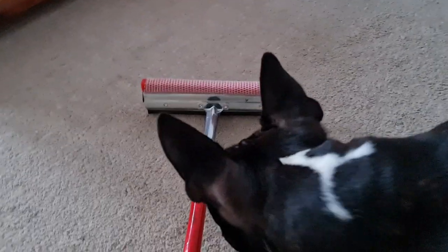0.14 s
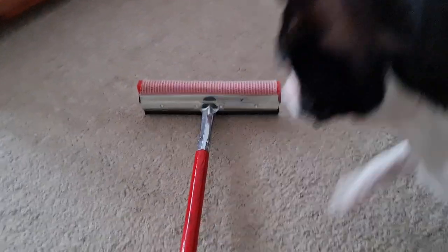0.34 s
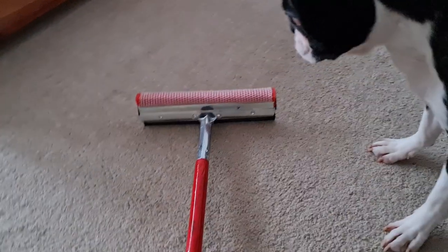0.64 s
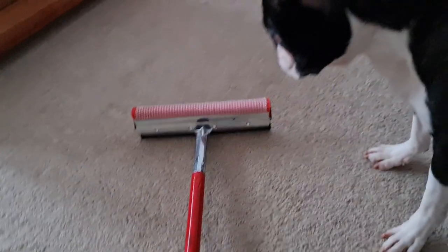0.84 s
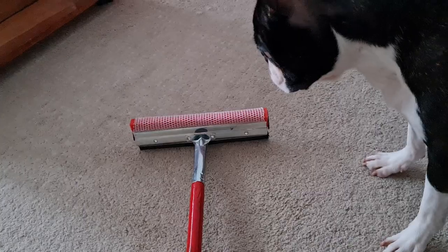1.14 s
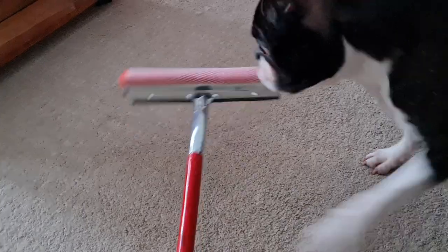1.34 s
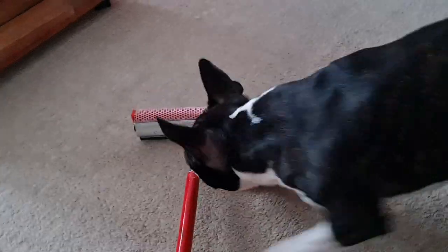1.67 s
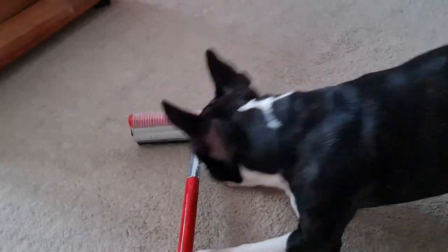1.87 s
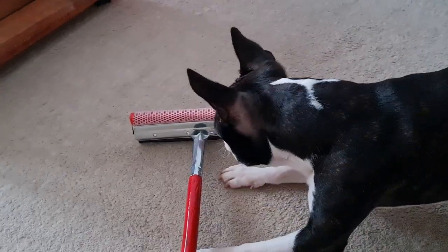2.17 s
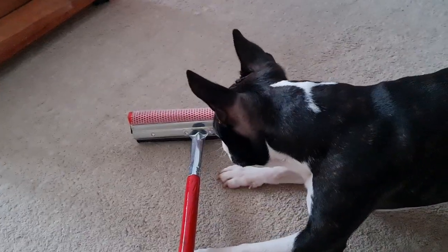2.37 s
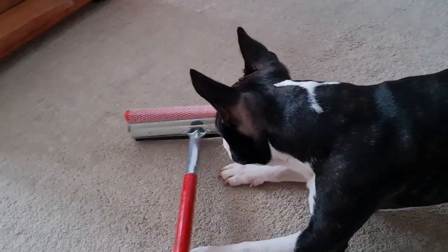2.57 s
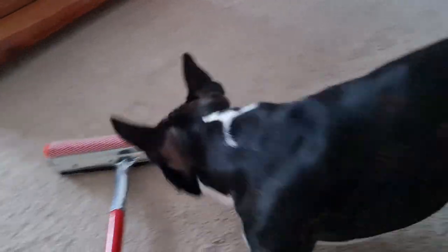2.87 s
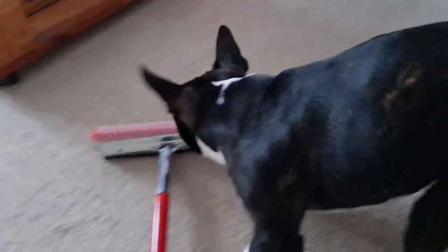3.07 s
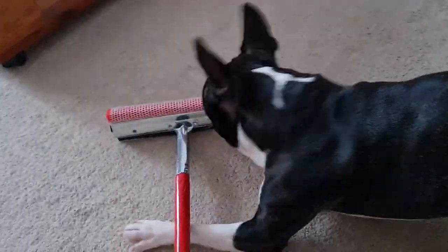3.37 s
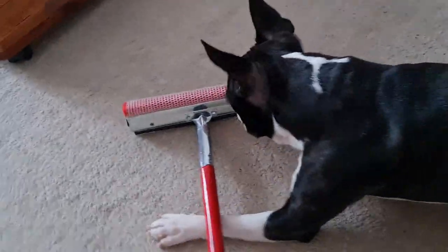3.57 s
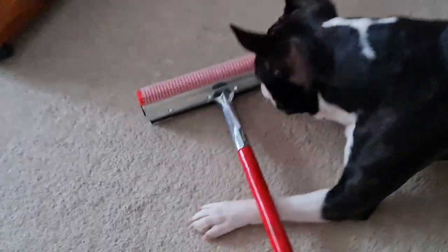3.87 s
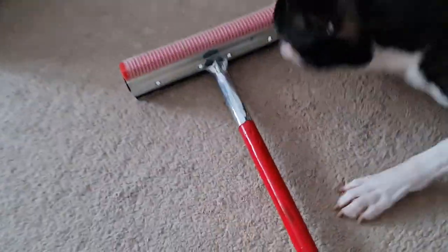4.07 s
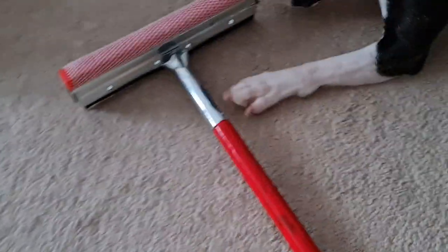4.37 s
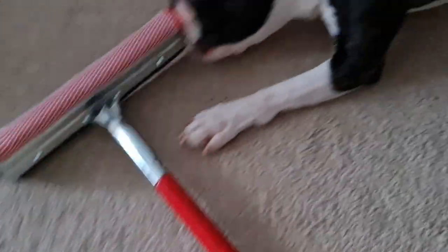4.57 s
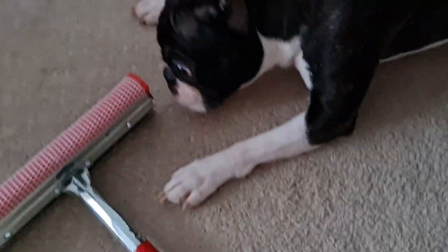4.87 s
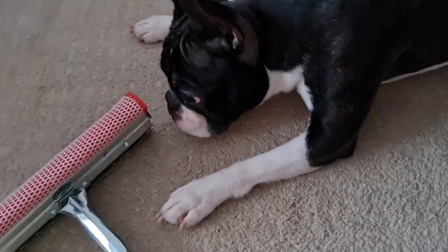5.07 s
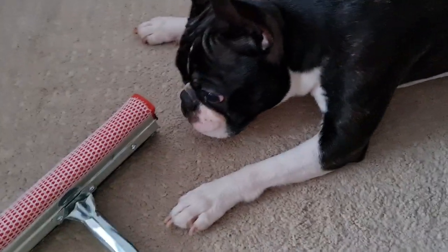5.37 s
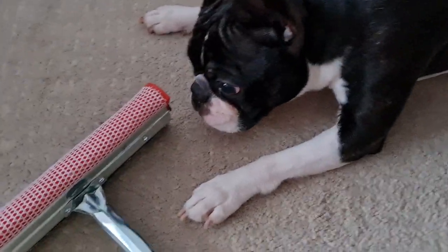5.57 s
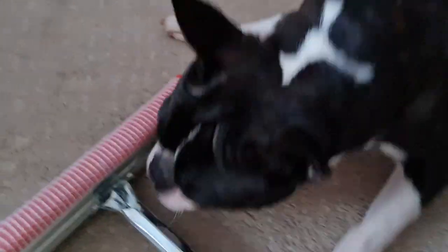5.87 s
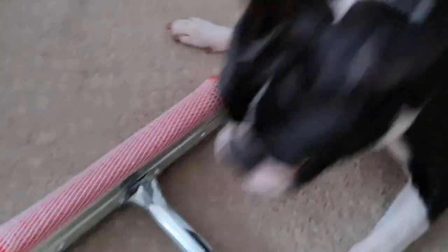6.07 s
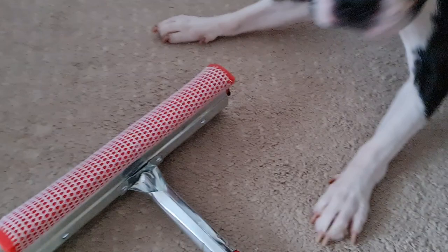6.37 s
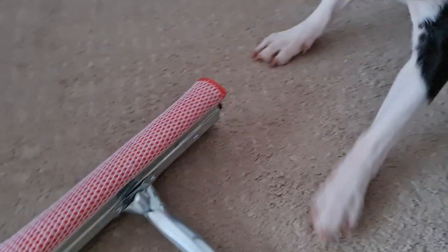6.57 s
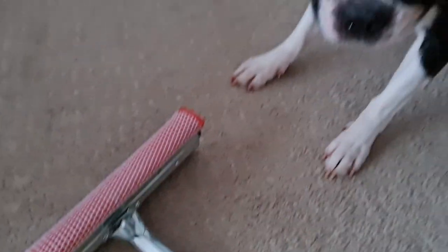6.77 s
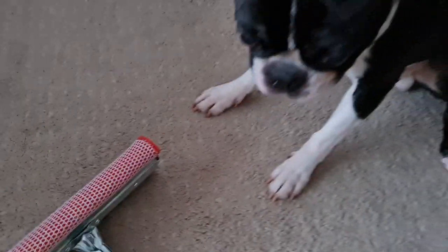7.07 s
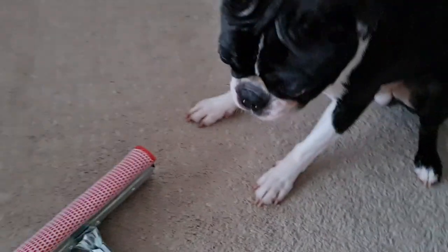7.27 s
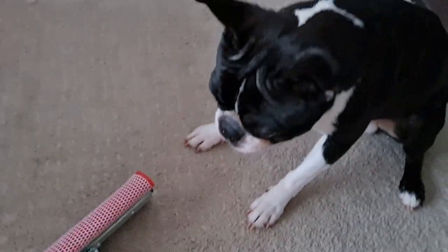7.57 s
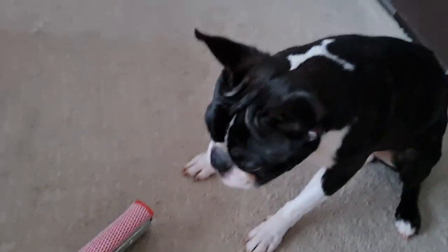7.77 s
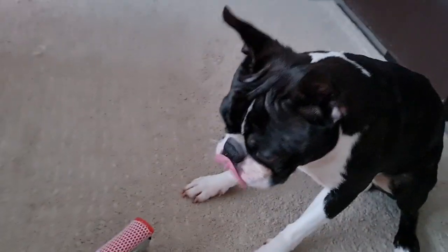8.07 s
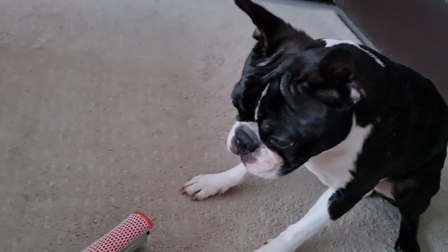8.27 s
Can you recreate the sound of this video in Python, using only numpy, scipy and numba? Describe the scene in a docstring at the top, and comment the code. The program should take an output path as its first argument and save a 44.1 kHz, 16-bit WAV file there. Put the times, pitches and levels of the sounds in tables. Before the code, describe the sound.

A small flat-nosed dog huffs and snorts close by, thumping, scuffing and clicking at a hard tool on carpet in a quiet room.

```python
"""Short nasal huffs, two flapping snorts, thumps, scuffs and clicks over a quiet room.
A small flat-nosed dog pounces at a squeegee on carpet, about a metre from a hand-held phone.
Huffs are noise ringing throat, nose and nostrils; snorts are palate slaps with air leaking by.
Blows excite the floor's low modes, contacts ring short resonances, dragging is jerky low noise;
a furnished room answers, and the phone's two microphone ports take it all in."""
import sys
import numpy as np
from scipy import signal
from scipy.fft import rfft, irfft, next_fast_len
from scipy.io import wavfile
from numba import njit

SR = 44100
rng = np.random.default_rng(int(sys.argv[2]) if len(sys.argv) > 2 else 0)


def store_pcm(level_fs):
    """Save levels as 16-bit WAV."""
    pcm = np.round(np.clip(level_fs, -1, 1) * 32767).astype(np.int16)
    wavfile.write(sys.argv[1], SR, np.atleast_2d(pcm).T)


N = 370910

# huffs: fully open t/s, swelling t/s, sagging t/s, crest level/dB, throat level/dB and nostril hiss
# level/dB against the nose, throat f/Hz at the crest, nose f/Hz, nose treble level/dB at 5 kHz,
# nostril f/Hz, fizz level/dB at 12 kHz
HUFFS = [(0.159, 0.037, 0.15, -47.5, -7, -8, 1250, 1840, -3.5, 9600, -2),
         (0.295, 0.06, 0.042, -37.5, -10.5, -1, 1250, 2500, -0.5, 9300, 0),
         (0.405, 0.031, 0.07, -51, -0.5, -5.5, 1250, 1900, 0, 9450, -5),
         (0.56, 0.051, 0.027, -68, -19, -8, 1000, 2100, 2, 9300, -1),
         (1.225, 0.017, 0.0083, -62, -9, -4, 870, 3280, 3, 9000, 4),
         (1.31, 0.11, 0.028, -58.5, -7, -1, 1100, 3000, -2, 9000, 3),
         (1.44, 0.033, 0.082, -57.5, -8, 7.5, 664, 2700, -5, 9100, 7),
         (1.51, 0.052, 0.048, -52, 4, 3, 1380, 3200, -8, 8700, 1),
         (1.645, 0.071, 0.089, -49.5, 7, -1, 1050, 2140, -3.5, 8700, 4),
         (1.803, 0.0092, 0.073, -45.5, 14.5, 4.5, 1080, 2630, -1, 9800, 2.5),
         (1.896, 0.0065, 0.17, -51.5, -1.5, -14, 1200, 2817, -10, 9100, 7),
         (2.617, 0.046, 0.06, -46.5, -10, -9, 1450, 2830, 0.5, 7900, -2),
         (2.688, 0.018, 0.069, -52.5, -4.5, 4, 1390, 2900, -5, 8900, 8),
         (2.809, 0.029, 0.05, -42.5, -23, -5, 1300, 2750, -1.5, 8400, 3),
         (2.885, 0.068, 0.012, -48, 3.5, -13, 1320, 2600, -3.5, 8600, 9),
         (2.992, 0.034, 0.015, -45, -14, -25, 1200, 2630, -3, 7800, 2),
         (3.084, 0.043, 0.058, -49, -4, -16, 1200, 2770, -5.5, 9000, 1),
         (3.191, 0.053, 0.067, -43, -4, 1, 1500, 1970, -3, 8900, 0.5),
         (3.277, 0.025, 0.075, -35.5, 3, -4, 1300, 2430, -3.5, 8700, 0.5),
         (3.43, 0.023, 0.3, -70, 2.5, -2.5, 1220, 2780, 7, 9000, 0.5),
         (3.707, 0.047, 0.22, -57.5, -10, -9.5, 1317, 2510, -2.5, 8600, 3),
         (3.953, 0.062, 0.036, -43, -2.5, -15, 1250, 2175, -6.5, 7800, -2),
         (4.092, 0.014, 0.039, -54.5, 8.5, -1, 1310, 2240, 0, 9500, 2),
         (4.201, 0.06, 0.054, -47.5, 2, -9, 1200, 2230, -4, 8500, -1),
         (4.332, 0.043, 0.012, -49, 3.5, -1, 1160, 2500, 0, 9200, 0),
         (4.48, 0.23, 0.034, -64.5, 17, -1, 1340, 3280, -1.5, 8300, -3),
         (4.787, 0.0091, 0.16, -63, 8.5, -6, 1005, 2344, -1, 10000, -8),
         (5.161, 0.042, 0.14, -75.5, 9, -17, 960, 4320, 4, 9000, -5.5),
         (5.56, 0.04, 0.04, -58.5, 4, -18.5, 640, 2300, -3, 7100, -1),
         (5.634, 0.035, 0.066, -47, -1, -18, 638, 2310, 1.5, 7100, 6),
         (5.692, 0.022, 0.04, -48, -2.5, -0.5, 1100, 2950, -1, 7500, -6),
         (5.738, 0.033, 0.068, -43.5, -1, -19, 1100, 2780, -0.5, 7600, 5),
         (5.84, 0.072, 0.074, -50, 9.5, -22, 1038, 2600, -3, 7100, 0),
         (6.008, 0.019, 0.065, -45, -1.5, -6, 1200, 3160, 0, 10100, 0),
         (6.103, 0.068, 0.067, -40, 4, -8.5, 1100, 3250, -5, 8900, 3),
         (6.272, 0.11, 0.089, -44, -17, -5, 1350, 3040, -0.5, 9450, 3.5),
         (6.442, 0.091, 0.058, -44, 0, -3, 1000, 3000, -2.5, 9050, 5),
         (6.641, 0.017, 0.011, -58, -3, -15.5, 758, 3000, -7.5, 9000, 2),
         (7.614, 0.051, 0.035, -58, -7, -2.5, 1200, 3506, 3.5, 8900, -9),
         (7.756, 0.013, 0.065, -38.5, -7, -5, 1200, 2340, 2, 9050, -6.5),
         (7.809, 0.044, 0.12, -42.5, -3.5, -0.5, 1250, 2220, 6, 9130, -4),
         (7.92, 0.068, 0.025, -46, -5.5, 3.5, 1150, 3700, -2.5, 9100, -1)]
# muzzle direction and wetness: t/s, left minus right level/dB, palate flutter share (0-1)
MUZZLE = [(.3, -4.5, 0.08), (1.55, -5, 0.4), (1.85, -2.5, 0.4), (2.7, -5, 0.42), (3.3, -4, 0.13),
          (3.75, -7.5, 0.2), (4.0, -1.5, 0.5), (4.35, -1.5, 0.1), (5.7, -4, 0.2), (6.17, 1.5, 0.19),
          (6.45, -2, 0.16), (7.8, 0.5, 0.3), (8.0, 1, 0)]
# fixed colour of the nasal passages: f/Hz, relative level/dB
NASAL_COLOUR = [(300, -24), (600, -12), (1200, -5), (1800, -1.5), (3200, -1), (3900, -4.5), (5200, -2.5),
                (6400, -9.5), (8000, -16), (14000, -29)]
# fixed colour of the jet at the nostrils: f/Hz, relative level/dB
NOSTRIL_COLOUR = [(4000, -21), (7000, -13.5), (8400, -7), (9600, -10), (10700, -12.5), (12300, -13),
                  (14200, -17.5), (15800, -14.5)]
# fixed colour of the throat: f/Hz, relative level/dB
THROAT_COLOUR = [(60, -14), (130, 2.5), (240, -19.5), (380, -9.5), (540, 1), (750, -0.5), (950, -4.5),
                 (1400, -6), (1800, -13.5), (3000, -36.5)]
# air ringing in a narrowing: start t/s, end t/s, start f/Hz, end f/Hz, level/dB,
# sharpness (twice the Q of each of two passes)
WHISTLES = [(0.214, 0.392, 737, 750, -52, 10), (0.679, 1.08, 940, 910, -76.5, 6.4),
            (1.016, 1.215, 2100, 1840, -74, 6.1), (1.497, 1.537, 1340, 1240, -43, 16),
            (1.545, 1.608, 1320, 1579, -43.5, 14), (1.555, 1.632, 1743, 2790, -46, 4.5),
            (1.5, 1.67, 3160, 3540, -58.5, 11), (1.815, 1.933, 1126, 1200, -56, 8.5),
            (3.268, 3.33, 1400, 1200, -31.5, 8.5), (3.3, 3.369, 750, 674, -44.5, 7.5),
            (3.815, 3.972, 7450, 7540, -66.5, 6.9), (4.443, 4.8, 1390, 1370, -56, 14),
            (4.705, 5.128, 1018, 928, -68.5, 13.3), (4.77, 4.99, 4800, 4700, -73.5, 8.2),
            (4.775, 4.959, 10160, 10560, -84, 23), (6.011, 6.074, 4940, 4760, -51, 16),
            (6.218, 6.63, 1200, 920, -49.5, 5.4), (6.08, 6.244, 3150, 3120, -49.5, 9),
            (6.26, 6.61, 3160, 3050, -54.5, 13), (7.679, 7.806, 1080, 1030, -61, 19),
            (7.752, 7.852, 1060, 786, -40, 4.1), (7.772, 8.015, 1600, 2290, -51.5, 4.4),
            (7.95, 8.054, 9270, 8000, -57.5, 10)]
# one curve per snort: t/s, flap rate f/Hz, peak level/dB before slap_db, treble level/dB at 8 kHz
SNORTS = [
    [(4.426, 23, -44, 17), (4.464, 29.7, -25.5, 3.5), (4.5, 25.4, -29.5, 5), (4.535, 25.8, -21.5, -7),
     (4.615, 23.6, -24.5, 0), (4.66, 36.4, -18.5, 0), (4.715, 35.93, -32, 14)],
    [(6.152, 58.4, -46, 0), (6.18, 63.6, -25, -15), (6.215, 64, -26.5, -13)],
]
# colour of the airway that a flap rings: f/Hz, relative level/dB
AIRWAY_COLOUR = [(50, -3), (140, 8.5), (270, -6), (530, 8), (720, 0.5), (900, -0.5), (1400, 6), (1800, -24),
                 (2080, -3.5), (2450, -32), (3200, -4), (3800, -29), (8000, -13), (15000, -50)]
# paws and squeegee landing and bouncing on the carpet: t/s, peak level/dB, centre of the push f/Hz
THUMPS = [(0.396, -39.5, 240), (0.478, -42.5, 224), (1.417, -22.5, 170.7), (1.428, -9.5, 310),
          (1.431, -18, 136), (1.445, -19.5, 300), (1.4553, -21, 330), (1.4623, -25.5, 390),
          (1.473, -24.5, 373.6), (1.586, -28, 327), (1.719, -32, 139), (1.812, -33, 280), (2.802, -21, 270),
          (2.901, -25, 397.7), (2.948, -29, 420.4), (3.13, -38.5, 357), (3.245, -23, 250.4),
          (3.975, -39.5, 470), (4.002, -32.5, 420), (4.18, -29.5, 270), (5.739, -26, 118),
          (5.785, -43, 134.3), (5.84, -41, 480), (5.969, -32.5, 160), (6.196, -50, 200)]
# modes of the carpeted floor: f/Hz, relative level/dB, t60/s
FLOOR_MODES = [(61.1, -18, 0.9), (122, -12.5, 0.3), (160, -5, 0.12), (200, 0.5, 0.018), (258, -9, 0.029),
               (353, -3, 0.057), (400, -6.5, 0.04), (472, 3.5, 0.025), (534, -9.5, 0.13),
               (699, -13.5, 0.15), (1100, -18.5, 0.058), (1140, -20.5, .06)]
# the dog scuffling on the carpet: start t/s, length t/s, level/dB at the height of the effort
SCUFFLES = [(1.594, 0.23, -46.5), (2.633, 0.31, -54), (2.827, 0.11, -41), (2.887, 0.2, -43.5),
            (3.094, 0.085, -51), (3.245, 0.15, -43), (3.966, 0.16, -47.5), (4.18, 0.14, -47),
            (5.748, 0.092, -43), (5.853, 0.21, -47), (6.161, 0.086, -50)]
# colour of the scuffling: f/Hz, relative level/dB
DRAG_COLOUR = [(40, -0.5), (75, 8), (135, 0), (250, -5), (440, 1.5), (800, -15.5), (2000, -37)]
# claws, teeth and lips clicking: t/s, peak level/dB before click_db, centre f/Hz, rattle t60/s
CLICKS = [(1.428, -21.5, 1698, 0.013), (1.427, -29, 5330, 0.018), (1.429, -16.5, 730, 0.016),
          (1.4362, -22.5, 2030, 0.0043), (1.519, -37.5, 3000, 0.012), (1.548, -35, 2600, 0.022),
          (1.8075, -28.5, 10600, 0.017), (1.9195, -51, 3790, 0.019), (2.309, -63.5, 6130, 0.022),
          (2.803, -33.5, 755, 0.012), (2.939, -33, 1200, 0.014), (2.95, -32.5, 2140, 0.014),
          (3.2442, -24.5, 2120, 0.015), (3.2788, -17.5, 1270, 0.014), (3.6924, -47, 2300, 0.025),
          (4.0254, -32, 1480, 0.015), (4.098, -37, 780, 0.043), (4.1798, -35, 1600, 0.01),
          (4.264, -29, 1100, 0.014), (4.382, -33, 1120, 0.054), (4.4425, -42, 1150, 0.01),
          (4.649, -47, 4670, 0.015), (4.677, -43, 4470, 0.02), (5.335, -67, 5010, 0.026),
          (5.392, -68.5, 2410, .015), (5.743, -32.5, 788, 0.01), (5.8433, -33.5, 900, 0.012),
          (5.8867, -25, 5000, 0.033), (5.925, -26.5, 1100, 0.022), (7.246, -63, 1503, 0.023),
          (7.289, -61, 1014, 0.015), (7.392, -53, 1100, 0.023), (7.502, -59.5, 1100, 0.021),
          (7.768, -29, 1100, 0.03), (8.125, -43, 4310, 0.022)]
# reverberation of the furnished room: f/Hz, t60/s, relative level/dB
ROOM_BANDS = [(119, 0.5, -6), (403, 0.35, -3.5), (1200, 0.36, -1), (3000, 0.45, -2), (7837, 0.17, 5),
              (13900, 0.26, -10.5)]
# colour of the still room: f/Hz, relative level/dB
HUSH_COLOUR = [(15, -40), (25, -1.5), (75, 2), (178, -23.5), (297, -17.5), (631, -28.5), (3720, -37.5),
               (7700, -50.5), (8580, -45), (15500, -45.5)]

# a huff opens for this share of its swelling time, swells to its crest, sags and is let go
OPENING_SHARE, SWELL_DB, SAG_DB, RELEASE_DB_PER_S = 1, 8, 12, 268
# the jet grows faster than the flow (power law); the throat resonance sinks as the lungs empty
HISS_POWER, THROAT_SINK_OCT_PER_S = 1.1, 0.47
# the twitching nose shifts its resonance, and the flow surges unevenly
TWITCH_OCT, TWITCH_HZ, SURGE_DB, SURGE_HZ = 0.12, 17, 1.5, 46.18
# air squeezes by before and after a flap, fading with this time constant
LEAK_S = 0.0045
# halfway between flaps the palate rebounds, weaker and hissier
REBOUND_DB, REBOUND_TREBLE_DB = -10, 4.5
# the weight follows the first touch as a second push, then shifts with a short rumble
SETTLE_S, SETTLE_DB, RUMBLE_DB, RUMBLE_S = 0.00453, -8.5, -35, 0.032
# below this pitch the floor lags, per octave down and for at most two octaves
BEND_TOP_HZ, BEND_LAG_S = 480, 0.004
# time a scuffle takes to set in
DRAG_ATTACK_S = 0.013
# the dog is off centre: its sound reaches the right port a little later
PORT_LAG_S = 0.00002
# top of the phone's range, also the upper limit for the softness of a click
TOP_HZ = 15800


def huffs(throat_ring=0.8, nose_ring=0.98, nostril_ring=1.2,
          throat_width_hz=320, nose_width_hz=900, nostril_width_hz=1100):
    """Turbulent air rings throat and nose, and hisses out of the narrow nostrils."""
    pan_db, wet = curves(MUZZLE)
    wet = np.clip(wet, 0, 1)
    puffs = flutter(rate_hz=110, scatter_db=3.5, fade_s=0.0075)
    chop = np.sqrt(1 - wet + wet * puffs ** 2)
    throat_air = colour(chop * rng.standard_normal(N), THROAT_COLOUR)
    nose_air = colour(chop * rng.standard_normal(N), NASAL_COLOUR)
    jet = colour(np.sqrt(chop) * rng.standard_normal(N), NOSTRIL_COLOUR)
    twitch = 2 ** (TWITCH_OCT * wander(TWITCH_HZ))
    surge = undb(SURGE_DB * wander(SURGE_HZ))
    air = ports(chop ** 2 * whistles(), turn_rad=2.4)
    for (s, swell_s, sag_s, db, throat_db, hiss_db, throat_hz, nose_hz,
         treble_db, nostril_hz, fizz_db) in HUFFS:
        i = np.arange(int(s * SR) - SR // 8, min(int(s * SR) + SR // 2, N))
        t = i / SR - s
        flow = airflow(t, swell_s, sag_s) * surge[i]

        sinking_hz = throat_hz * 2 ** (-THROAT_SINK_OCT_PER_S * (t - swell_s))
        throat_tone = resonate(throat_air[i], sinking_hz, throat_width_hz)[0]
        throat = unit(throat_air[i] + throat_ring * throat_tone)

        nose_tone = resonate(nose_air[i], nose_hz * twitch[i], nose_width_hz)[0]
        nose = nose_air[i] + nose_ring * nose_tone
        nose = colour(nose, [(2800, 0), (5000, treble_db), (12000, fizz_db)])

        nostril_tone = resonate(jet[i], nostril_hz, nostril_width_hz)[0]
        nostril = unit(jet[i] + nostril_ring * nostril_tone)
        nostril = colour(nostril, [(10000, 0), (12000, fizz_db)])
        hiss = undb(hiss_db) * nostril * flow ** HISS_POWER

        breath = flow * (undb(throat_db) * throat + nose) + hiss
        air[:, i] += undb(db) * ports(breath)
    return nearby(air) * undb(np.array([pan_db, -pan_db]) / 2)


def airflow(t, swell_s, sag_s):
    """Strength of one huff: it opens before t = 0, then swells, sags and is released."""
    held_db = np.interp(t, [0, swell_s, swell_s + sag_s], [-SWELL_DB, 0, -SAG_DB])
    release_db = -RELEASE_DB_PER_S * np.maximum(t - swell_s - sag_s, 0)
    # a sharp huff also opens sharply
    opening = np.clip(1 + t / (OPENING_SHARE * swell_s), 0, 1) ** 2
    return opening * undb(held_db + release_db)


def whistles():
    """Eddies at a narrowing ring gliding, breathy notes."""
    out = np.zeros(N)
    for start, end, from_hz, to_hz, db, sharpness in WHISTLES:
        size = max(int((end - start) * SR), 100)
        hz = np.geomspace(from_hz, to_hz, size)
        width = hz / sharpness * 2
        note = resonate(resonate(rng.standard_normal(size), hz, width), hz, width)[0]
        swell = np.sin(np.pi * np.arange(size) / size)
        out[int(start * SR):][:size] += undb(db) * unit(note * swell)
    return out


def snort(slap_db=-1, slap_hz=1900, leak_db=-26, pan_db=2):
    """The soft palate slaps shut again and again; slaps and leaking air both ring the airway."""
    out = np.zeros((2, N))
    t = np.arange(-SR // 50, SR // 20) / SR
    # soft tissue closes dully, so most of the treble is escaping air
    dull = signal.butter(4, slap_hz, fs=SR, output="sos")
    slap = signal.sosfilt(dull, (t == 0) * 1.)
    for one_snort in SNORTS:
        for s, db, treble_db in flaps(one_snort):
            leak = np.exp(-np.abs(t) / LEAK_S) * rng.standard_normal((2, len(t)))
            tilted = [(hz, level_db + treble_db * hz / 8000) for hz, level_db in AIRWAY_COLOUR]
            ring = colour(slap + undb(leak_db) * leak, tilted)
            add(out, s + t[0], ring, db + slap_db)
    return out * undb(np.array([[pan_db], [-pan_db]]) / 2)


def flaps(one_snort):
    """The palate shuts once a cycle and rebounds halfway: t/s, peak and treble level/dB."""
    rate, db, treble_db = curves(one_snort)
    i = np.arange(int(one_snort[0][0] * SR), int(one_snort[-1][0] * SR))
    half_cycles = np.floor(2 * np.cumsum(rate[i]) / SR)
    at = i[np.diff(half_cycles, prepend=-1) > 0]
    rebound = np.arange(len(at)) % 2
    return zip(at / SR, db[at] + REBOUND_DB * rebound, treble_db[at] + REBOUND_TREBLE_DB * rebound)


def thumps(spread=1.0, scuff_db=-19, scuff_hz=650, scuff_s=0.023):
    """A padded blow rings the floor's low modes, falling in pitch; the pile scuffs under the paw."""
    out = np.zeros((2, N))
    t = np.arange(SR // 2) / SR
    floor = sum(undb(db - 60 * t / t60) * np.sin(2 * np.pi * hz * t) for hz, db, t60 in FLOOR_MODES)
    floor = bend(floor)
    settle = np.arange(len(t)) == int(SETTLE_S * SR)
    touch = (t == 0) + undb(SETTLE_DB) * settle
    for s, db, hz in THUMPS:
        shift = undb(RUMBLE_DB) * np.exp(-t / RUMBLE_S) * diffuse(len(t))
        push = resonate(resonate(touch + shift, hz, spread * hz), hz, spread * hz)
        add(out, s, signal.fftconvolve(push, floor[None])[:, :len(t)], db)
        # noise with uneven sample strengths, dying away as a dull scuff
        noise = np.exp(-t / scuff_s) * diffuse(len(t)) * rng.exponential(size=len(t))
        scuff = resonate(resonate(noise, scuff_hz, 1000), scuff_hz, 1000)
        add(out, s, scuff, db + scuff_db)
    return out


def bend(x):
    """Bending waves in the boards: the low notes arrive last, so each blow falls in pitch."""
    size = 2 * len(x)
    f = np.maximum(np.fft.rfftfreq(size, 1 / SR), 1)
    late_s = BEND_LAG_S * np.clip(np.log(BEND_TOP_HZ / f) / np.log(2), 0, 2)
    # summing the delay over frequency gives the phase
    phase = 2 * np.pi * np.cumsum(late_s) * SR / size
    return irfft(rfft(x, size) * np.exp(-1j * phase), size)[:len(x)]


def scuffles():
    """Paws and chest drag over the pile in uneven jerks, and the floor rumbles under them."""
    jerks = flutter(rate_hz=86, scatter_db=4.0, fade_s=0.0047)
    rumble = colour(jerks * diffuse(N, apart_hz=450), DRAG_COLOUR)
    t = np.arange(N) / SR
    effort = np.zeros(N)
    for s, length_s, db in SCUFFLES:
        effort += undb(db) * np.interp(t, [s, s + DRAG_ATTACK_S, s + length_s], [0, 1, 0])
    return effort * rumble


def clicks(click_db=1, rattle_db=-11, spread=0.4, body_ratio=0.66, body_db=-4, hardness=1.9):
    """A hard contact and a dying rattle ring a broad resonance and the duller body behind it."""
    out = np.zeros((2, N))
    t = np.arange(SR // 6) / SR
    for s, db, hz, t60 in CLICKS:
        rattle = np.exp(-np.log(1000) * t / t60) * rng.standard_normal((2, len(t)))
        contact = (t == 0) + undb(rattle_db) * rattle
        # a low-pitched contact is also a soft one
        softness = signal.butter(2, min(hardness * hz, TOP_HZ), fs=SR, output="sos")
        soft = signal.sosfilt(softness, contact)
        body_hz = body_ratio * hz
        body = undb(body_db) * resonate(soft, body_hz, spread * body_hz)
        add(out, s, resonate(soft, hz, spread * hz) + body, db + click_db)
    return out


def nearby(x, echo_db=-14, reach_s=0.005, drift_s=0.0006, count=4):
    """Echoes off the dog's body, floor and holder comb the sound, shifting as the head moves."""
    i = np.arange(N)
    out = x.copy()
    for channel, source in zip(out, x):
        for share in (np.arange(count) + rng.random(count)) / count:
            path = wander(rate_hz=6)
            lag = np.abs(reach_s * share + drift_s * path) * SR
            channel += undb(echo_db) * source[i - lag.astype(int)]
    return out / np.sqrt(1 + count * undb(echo_db) ** 2)


def ports(x, turn_rad=2.2, ripple_hz=400, bend_hz=900):
    """Scatter round the phone's body turns short waves' phase apart at the ports, anew each call."""
    size = next_fast_len(len(x))
    f = np.fft.rfftfreq(size, 1 / SR)
    scatter = rng.standard_normal(200)
    ripple = np.interp(f / ripple_hz, np.arange(len(scatter)), scatter)
    turn = turn_rad * ripple * np.minimum(f / bend_hz, 1)
    return irfft(rfft(x, size) * np.exp(1j * np.array([turn, -turn]) / 2), size)[:, :len(x)]


def off_centre(x):
    """Delay the right channel by the extra way to its port."""
    size = next_fast_len(N)
    late = np.exp(-2j * np.pi * np.fft.rfftfreq(size, 1 / SR) * PORT_LAG_S)
    return np.array([x[0], irfft(rfft(x[1], size) * late, size)[:N]])


def room(x, first_s=0.0036):
    """Diffuse reflections, different at each side, dying band by band."""
    t = np.arange(SR * 3 // 4) / SR
    f = np.maximum(np.fft.rfftfreq(len(t), 1 / SR), 1)
    echoes = rfft(diffuse(len(t)))
    centres = np.log(np.array(ROOM_BANDS)[:, 0])
    tail = 0
    for band, (hz, t60, db) in zip(np.eye(len(ROOM_BANDS)), ROOM_BANDS):
        # neighbouring bands crossfade along log frequency
        share = np.interp(np.log(f), centres, band)
        decay = np.exp(-np.log(1000) * t / t60)
        tail = tail + irfft(echoes * share, len(t)) * undb(db) * decay
    tail = unit(tail * (t > first_s)) / np.sqrt(len(t))
    return signal.fftconvolve(x.mean(axis=0)[None], tail, axes=1)[:, :N]


def hush(hush_db=-63.5, drone_hz=345, drone_db=-76):
    """Low rumble of the house under a soft, airy drone."""
    drone = unit(resonate(resonate(diffuse(N), drone_hz, 62), drone_hz, 62))
    return undb(hush_db) * colour(diffuse(N), HUSH_COLOUR) + undb(drone_db) * drone


def flutter(rate_hz, scatter_db, fade_s):
    """Uneven puffs or jerks, each dying away exponentially; rms 1."""
    chance = rng.standard_normal((2000, 2))
    gaps = np.exp(0.35 * chance[:, 0])
    at = (np.cumsum(gaps) * SR / rate_hz).astype(int)
    puffs = np.zeros(N)
    puffs[at[at < N]] = undb(scatter_db * chance[at < N, 1])
    return unit(signal.lfilter([1], [1, -np.exp(-1 / (fade_s * SR))], puffs))


def wander(rate_hz):
    """Random unsteadiness, spread near 1, with a new target at the given rate."""
    steps = rng.standard_normal(2000)
    return np.interp(np.arange(N) / SR * rate_hz, np.arange(len(steps)), steps)


def diffuse(size, apart_hz=260):
    """Noise from all around: long waves reach both sides alike, short ones do not."""
    mid, side = rng.standard_normal((2, size))
    side = signal.sosfilt(signal.butter(1, apart_hz, "high", fs=SR, output="sos"), side)
    return np.array([mid + side, mid - side])


def colour(x, points):
    """Shape a sound by f/Hz, level/dB points; rms 1."""
    hz, db = np.transpose(points)
    size = next_fast_len(x.shape[-1])
    f = np.maximum(np.fft.rfftfreq(size, 1 / SR), 1)
    gain = undb(np.interp(np.log(f), np.log(hz), db))
    return unit(irfft(rfft(x, size) * gain, size)[..., :x.shape[-1]])


@njit
def svf(x, hz, width):
    """State-variable band-pass whose centre may move."""
    y, band, low = np.empty(len(x)), 0., 0.
    for i in range(len(x)):
        g = np.tan(np.pi * hz[i] / SR)
        k = width[i] / hz[i]
        v = (band + g * (x[i] - low)) / (1 + g * (g + k))
        band = 2 * v - band
        low = low + 2 * g * v
        y[i] = k * v
    return y


def resonate(x, hz, width):
    """One resonance on every channel, gain 1 at its centre."""
    flat = np.ones(x.shape[-1])
    centre = np.minimum(hz, .45 * SR) * flat
    # the tiny offset keeps the filter's state from fading into denormal numbers
    return np.array([svf(c + 1e-18, centre, width * flat) for c in np.atleast_2d(x)])


def add(track, s, sound, db):
    """Lay a sound into a track at a time, its mid signal peaking at a level."""
    start = int(s * SR)
    peak = np.abs(sound.mean(axis=0)).max()
    track[:, start:start + sound.shape[1]] += undb(db) / peak * sound[:, :N - start]


def curves(rows):
    """Each column of a table as a line through time."""
    s, *columns = np.transpose(rows)
    return [np.interp(np.arange(N) / SR, s, c) for c in columns]


def undb(db):
    """Decibels to gain."""
    return 10 ** (np.asarray(db) / 20)


def unit(x):
    """Scale to rms 1."""
    return x / np.sqrt(np.mean(x ** 2))


def scene(air_room_db=-11, snort_room_db=-9, thump_room_db=-9, click_room_db=-7):
    """The dog close by, each of its sounds with its own share of the room."""
    sources = [(huffs(), air_room_db), (snort(), snort_room_db),
               (thumps() + scuffles(), thump_room_db), (clicks(), click_room_db)]
    direct = off_centre(sum(x for x, _ in sources))
    reflected = room(sum(x * undb(db) for x, db in sources))
    return direct + reflected + hush()


def record(dry, low_hz=42):
    """The phone thins the deepest bass and cuts the top."""
    thin = signal.sosfilt(signal.butter(3, low_hz, "high", fs=SR, output="sos"), dry)
    return signal.sosfilt(signal.ellip(10, .2, 80, TOP_HZ, fs=SR, output="sos"), thin)


dry = scene()
out = record(dry)
store_pcm(out)
```